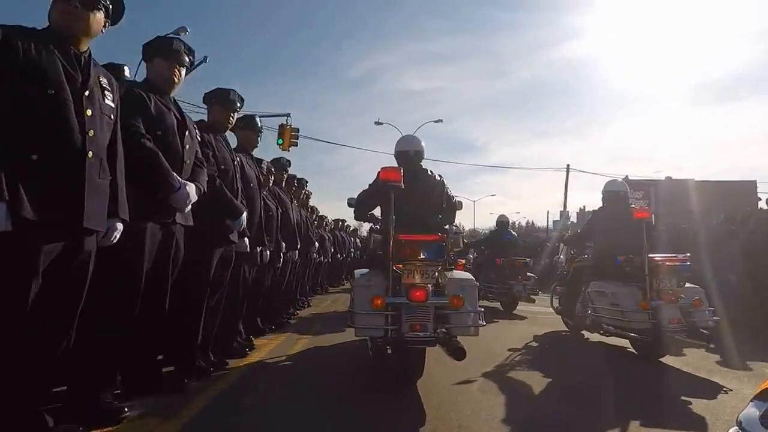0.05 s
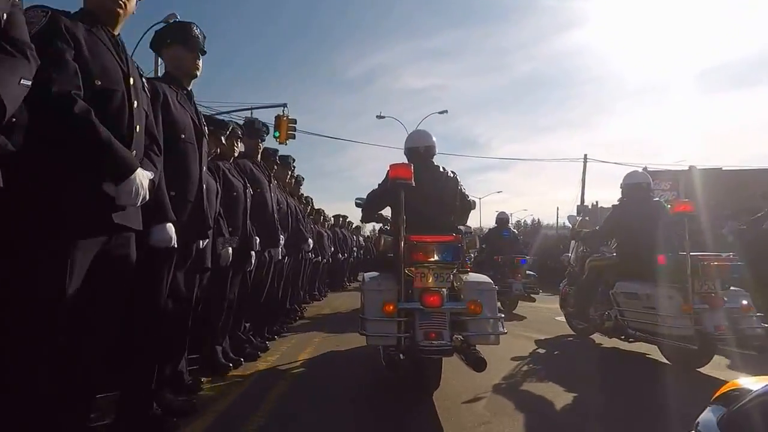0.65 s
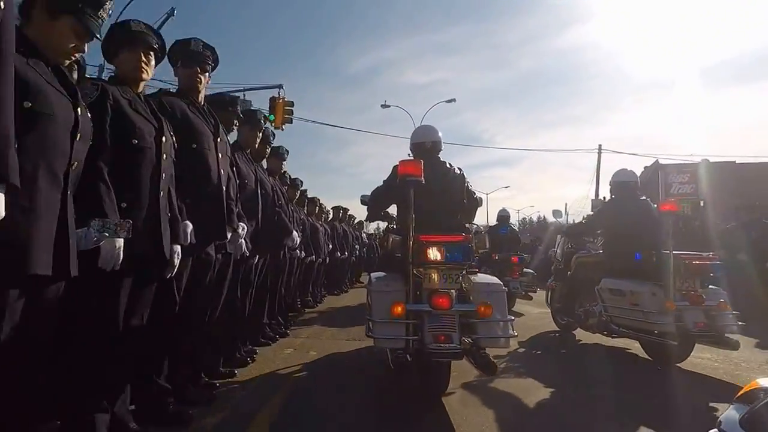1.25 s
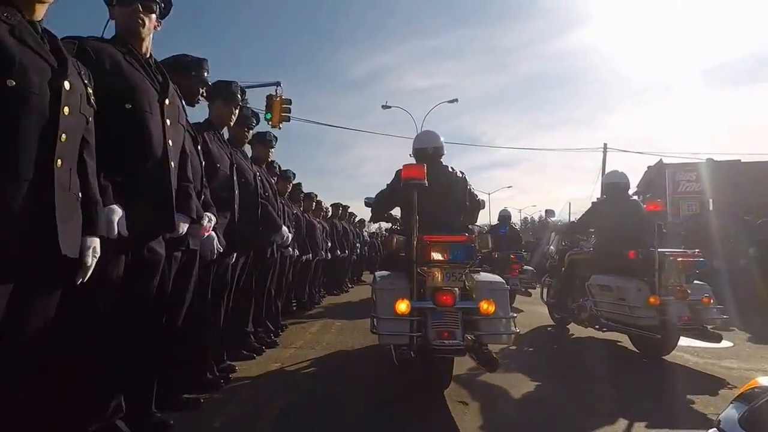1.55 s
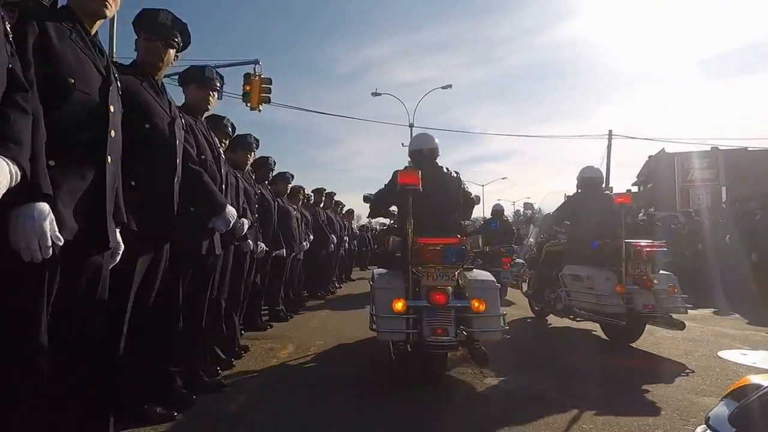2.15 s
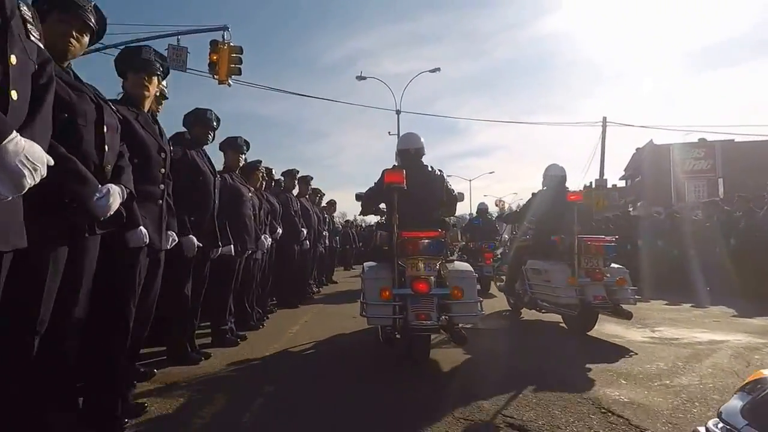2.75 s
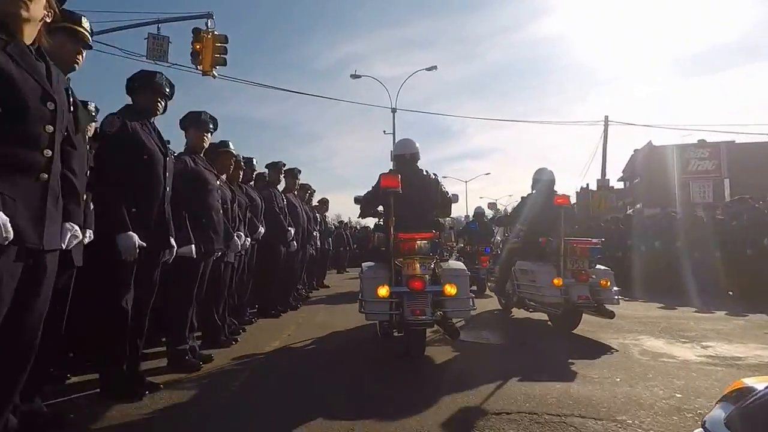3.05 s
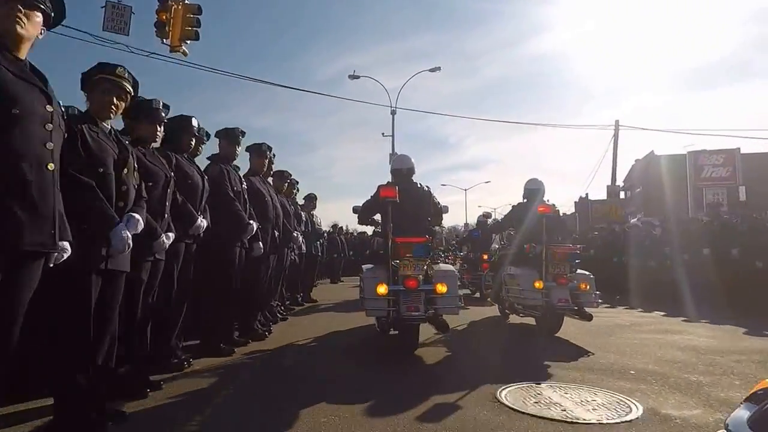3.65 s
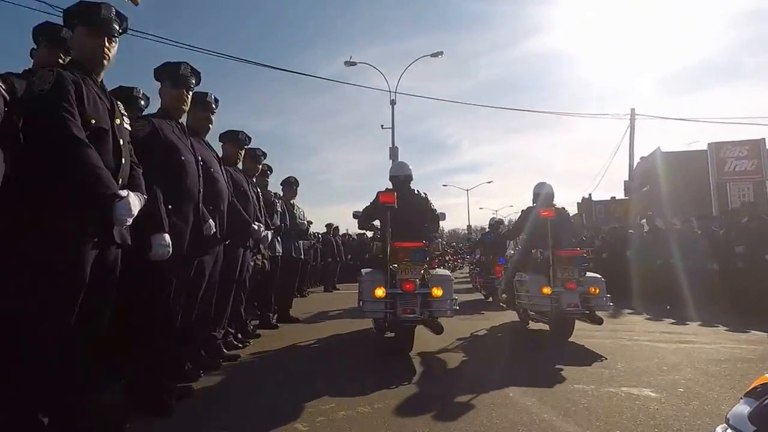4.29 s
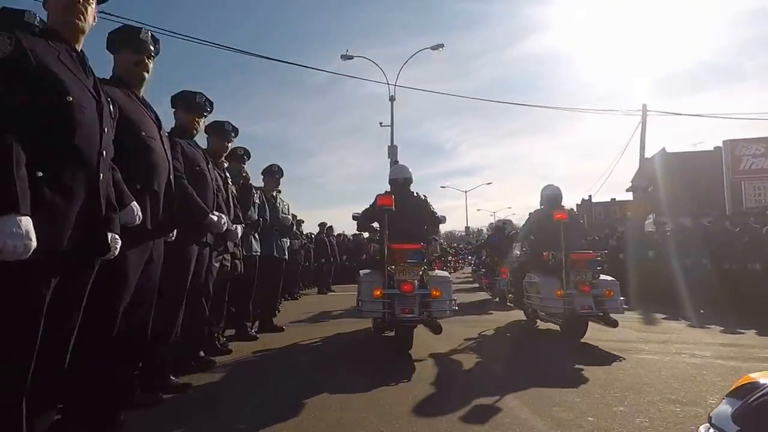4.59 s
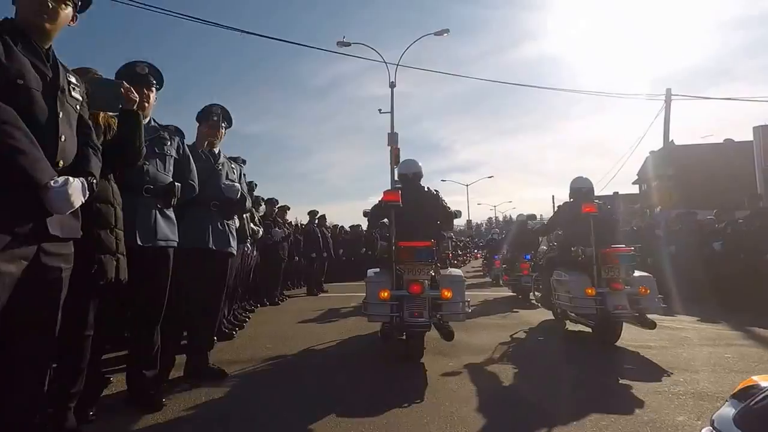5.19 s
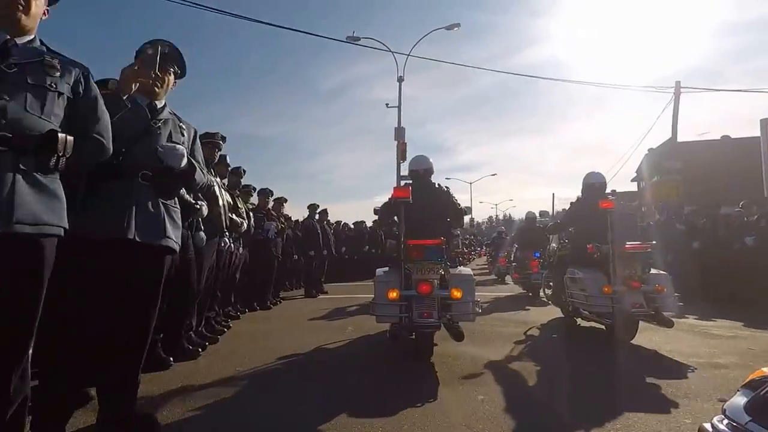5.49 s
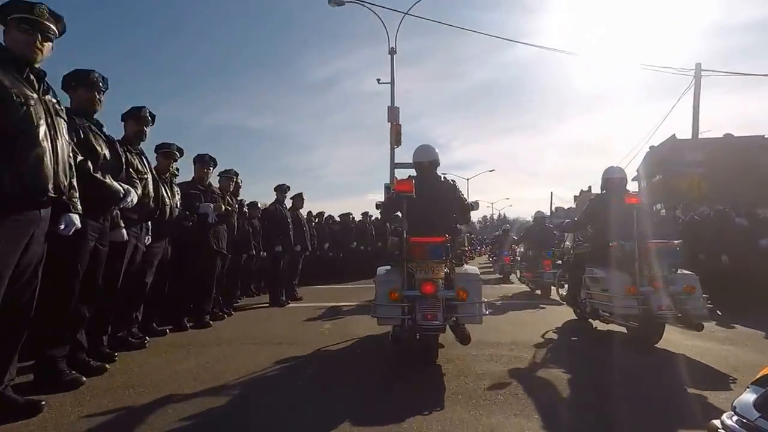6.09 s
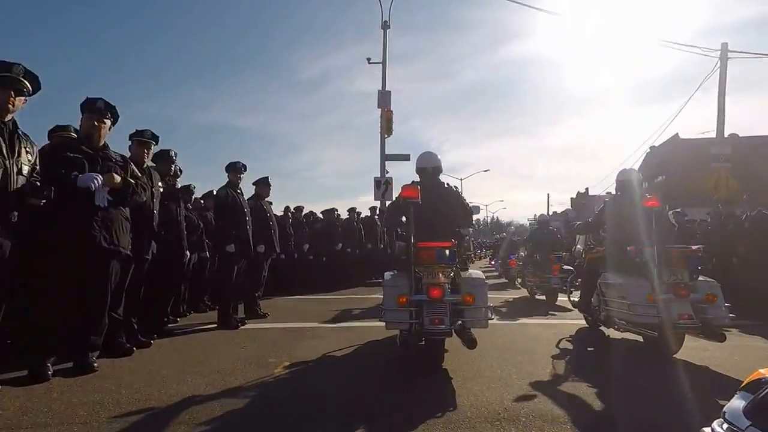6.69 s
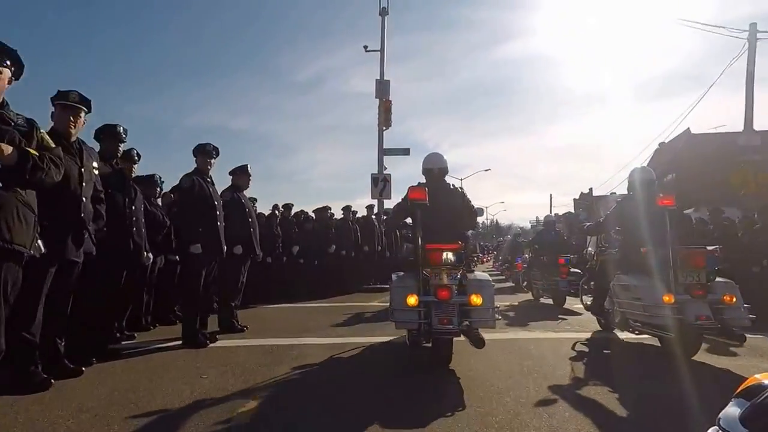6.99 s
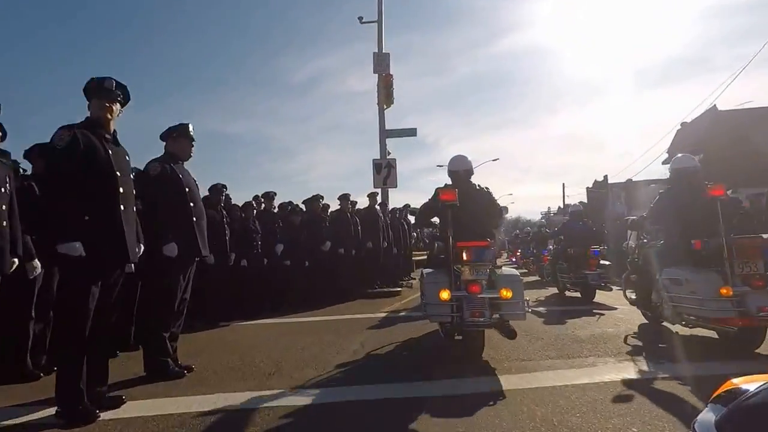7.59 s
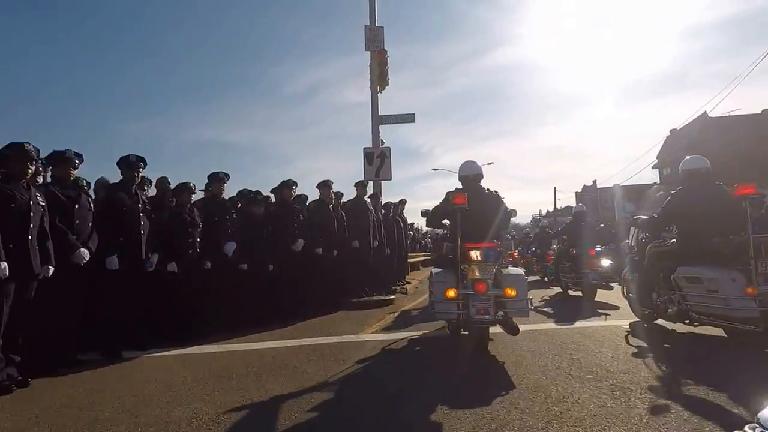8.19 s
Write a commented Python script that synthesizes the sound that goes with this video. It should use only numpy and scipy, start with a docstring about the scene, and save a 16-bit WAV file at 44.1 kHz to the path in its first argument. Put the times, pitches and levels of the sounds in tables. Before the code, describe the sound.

Heard from on board, a slow motorcycle chugs with a deep, shaking throb and busy mechanical ticking. The throttle opens a little and eases off twice, the engine sinks to a low idle, then two quicker swells follow. Pistons clank lightly now and then. Several more motorcycles drone close ahead, drifting in and out of step, with faint street traffic underneath.

```python
"""A V-twin motorcycle rolls along a street at walking pace, barely above idle, with four throttle swells.
Its crank shakes the mount of an on-board camera and its firings boom through exhaust and bodywork.
The valve gear clatters and ticks, the pistons slap their cylinders, and one tiny squeak slips out.
More motorcycles chug along just ahead, over a soft wash of traffic."""
import sys
import numpy as np
from scipy import signal
from scipy.fft import rfft, irfft, next_fast_len
from scipy.io import wavfile
from scipy.ndimage import uniform_filter1d, map_coordinates

SR = 44100
rng = np.random.default_rng(int(sys.argv[2]) if len(sys.argv) > 2 else 0)


def wav_out(sig):
    """Save sig, one row per channel (or a flat mono array), as 16-bit PCM at SR to the path in sys.argv[1]."""
    wavfile.write(sys.argv[1], SR, np.round(np.clip(np.atleast_2d(sig).T, -1, 1) * 32767).astype(np.int16))


N = 372204
TIME = np.arange(N) / SR
# ring of a slapped cylinder: (frequency [Hz], width [Hz], gain [dB])
CYLINDER_MODES = [(1395, 63, -9.5), (1645, 68, 0.5), (1812, 140, -7), (2108, 120, -14.5)]


def exhaust(turns, speed):
    """The firings hum as a stack of harmonics; each booms as the speed carries it through a resonance."""
    # exhaust harmonics: (crank order [per turn], direct gain [dB], resonant gain [dB])
    harmonics = [(2, -64, -14.5), (2.5, -42, -18), (3, -38, -10), (3.5, -30, -34), (4, -46, -22.5),
                 (4.5, -45, -24), (5, -47, -27), (5.5, -47, -25), (6, -47, -36)]
    # exhaust resonances: (frequency [Hz], half width [Hz])
    hollows = [(66, 3.77), (131, 7.3)]
    # fader on the whole note: (time [s], gain [dB])
    fader = [(0, -8.5), (.3, -0.5), (.9, 2.5), (1.2, -5), (1.6, 2.5), (1.8, 1), (2.05, 1), (2.5, -1.5),
             (3.3, 0), (4.2, -3), (5.2, -4), (5.6, -8), (6.4, -0.5), (7, -3), (7.9, -1), (8.44, -1.5)]
    fader_db, = curves(fader)
    note = np.zeros(N)
    for order, direct_db, resonant_db in harmonics:
        resonance = sum(1 / (1 + ((order * speed - hz) / width) ** 2) for hz, width in hollows)
        # the mixture burns a little unevenly, so timing and size waver
        phase = order * turns + rng.random() + wobble(6) / 50
        gain = (amp(direct_db) + amp(resonant_db) * resonance) * amp(0.78 * wobble(13))
        note += gain * np.sqrt(2) * np.sin(2 * np.pi * phase)
    return amp(fader_db) * note


def crank_shake(turns, speed, mount_hz=27.5, width_hz=5.8):
    """The unbalanced crank shakes the mount once a turn, less as the speed leaves its resonance."""
    # brief dips in the deep shake: (time [s], half length [s], depth [dB])
    dips = [(.68, .17, -10), (1.36, 0.04, -4), (5.623, 0.069, -7), (6.331, 0.19, -14), (6.72, 0.065, -6),
            (7.751, 0.11, -2.5)]
    response = 1 / np.hypot(1, 2 * (speed - mount_hz) / width_hz)
    dips_db = sum(db * bump(s, half_length) for s, half_length, db in dips)
    return amp(-13 + dips_db) * response * unit(np.sin(2 * np.pi * turns))


def contacts(turns):
    """Pistons and valve gear repeat one run of blows each cycle; gives its thuds, clacks and ticks."""
    # blows of a two-turn cycle: (crank angle [turns], thud gain [dB], clack gain [dB], tick gain [dB])
    pattern = [(0.098, 7, -30, 7), (0.268, -1, 24.5, -46), (0.534, 7, 13, -32), (0.655, 1.5, 16.5, 13),
               (.77, 0, 2, 16), (0.979, -3.5, 14, 6.5), (1.19, -6.5, -37, 7), (1.331, -0.5, 16.5, 10),
               (1.568, -1, -11, 8.5), (1.691, 2, -10, 15)]
    angles, *gains_db = np.transpose(pattern)
    blows = np.array([strokes(turns, angle, scatter_db=1, jitter_s=.0001) for angle in angles])
    return [unit(amp(db) @ blows) for db in gains_db]


def panel_rumble(shake, speed):
    """Dull blows ring the body panels, louder while the engine gains speed."""
    # panel resonances: (frequency [Hz], width [Hz], gain [dB])
    modes = [(209, 37, -44), (239.6, 12.9, -1), (293.4, 22, 5.5), (385, 35, -1.5), (462.3, 30, -5),
             (501.7, 33, -3.5), (704.7, 31, -9), (863, 60, -6), (1061, 140, -16.5)]
    rumble = effort_gain(-36.5, 1.95) * even(ring(shake, modes, low_hz=196, high_hz=1270))
    acceleration = uniform_filter1d(np.gradient(speed) * SR, size=SR // 5)  # turns/s per second
    return amp(0.0778 * acceleration) * rumble


def fairing_song(shake, turns, speed):
    """The fairing rings with the blows and sings as engine harmonics sweep onto its resonance."""
    # fairing resonances: (frequency [Hz], width [Hz], gain [dB])
    modes = [(643, 44, 9), (670, 32, -20)]
    # whining engine harmonics: (crank order [per turn], gain [dB])
    harmonics = [(18.5, -10), (20.5, -9), (22, -13)]
    # the whine throbs at cruise and steadies at speed: (crank speed [turns/s], depth [nepers])
    throb_depths = [(29, .5), (30.5, 1.7), (31.7, 1.7), (33.5, .25)]
    # swells of the song: (time [s], relative level [dB])
    fader = [(0.0, -44.5), (0.63, -46.5), (1.48, -36.5), (1.55, -41), (1.69, -33), (2.07, -41.5),
             (2.11, -38), (2.44, -42), (3.62, -35.5), (4.47, -45), (5.69, -47.5), (6.53, -37.5),
             (7.05, -47), (7.69, -40.5), (7.78, -40), (7.9, -34.5), (8.37, -46.5), (8.44, -43)]
    fader_db, = curves(fader)
    whine = sum(amp(db) * np.sin(2 * np.pi * order * turns) for order, db in harmonics)
    depth = np.interp(speed, *np.transpose(throb_depths))
    throb = np.exp(depth * np.cos(np.pi * (turns - 1.8)))  # peaks on the rear cylinder's power stroke
    song = ring(shake + amp(-8) * throb * whine, modes, low_hz=610, high_hz=700)
    return amp(fader_db + 0.5) * even(song)


def valve_clatter(clacks, ticks):
    """Hard contacts ring the casing and the cooling fins over a steady churn."""
    # engine casing resonances: (frequency [Hz], width [Hz], gain [dB])
    casing_modes = [(1308, 43, 3.5), (1384, 40, 5), (1500, 95, -3), (1588, 37, 3.5), (1654, 66, 4),
                    (1745, 27, 2), (1809, 108, 1), (2013, 78, -0.5), (2178, 145, -2.5), (2430, 58, -8)]
    # cooling fin resonances: (frequency [Hz], width [Hz], gain [dB])
    fin_modes = [(2720, 150, -9), (2912, 235, 6.5), (3172, 175, 10), (3320, 268, 10.5), (3518, 115, 8.5),
                 (3844, 460, 6.5), (4067, 220, -1), (4324, 260, 9.5), (5660, 520, -3.5), (5750, 170, -9),
                 (7200, 140, 1.5), (7680, 780, -3.5), (8200, 400, -6.5), (9900, 1350, -11.5)]
    blows = clacks + bursts(clacks, decay_s=0.0064)
    casing_drive = blows + amp(5.5) * rng.standard_normal(N)
    fin_drive = amp(-20) * blows + bursts(ticks, decay_s=0.011) + amp(3.5) * rng.standard_normal(N)
    clatter = even(ring(casing_drive, casing_modes, low_hz=1205, high_hz=2900))
    hiss = even(ring(fin_drive, fin_modes, low_hz=2250, high_hz=13100))
    return effort_gain(-37.5, 1.55) * clatter + effort_gain(-47.5, 2.07) * hiss


def tappets(ticks, scatter_db=7):
    """Tappets give dry ticks and crisp snaps; no two valves seat equally hard."""
    # tone of a tick: (frequency [Hz], gain [dB])
    tick_eq = [(2000, -35), (4000, 2), (7500, -4), (9000, -6.5), (10500, -11.5), (12000, -22), (13500, -17),
               (15000, -26)]
    # tone of a snap: (frequency [Hz], gain [dB])
    snap_eq = [(5000, -25), (8000, -3), (11000, -3), (13500, -3), (15000, -7)]
    tick_hits, snap_hits = ticks * amp(scatter_db * rng.uniform(-1, 1, (2, N)))
    ticking = coloured(bursts(tick_hits, decay_s=0.0092), tick_eq)
    snapping = coloured(bursts(snap_hits, decay_s=0.0018), snap_eq)
    return effort_gain(-57, 1.5) * ticking + effort_gain(-66, 1.7) * snapping


def piston_slap(turns):
    """Each piston rocks once a cycle and rings its cylinder; a brief chatter colours every slap."""
    # slap under the changing load: (time [s], rear level [dB], front level [dB])
    faders = [(0, -38, -51), (.5, -42, -43), (1.05, -41.5, -48), (1.5, -42.5, -40), (2, -51, -40.5),
              (2.4, -42, -46), (3.1, -41, -45), (4.2, -40.5, -45), (4.5, -45, -47.5), (5.4, -48, -55),
              (5.8, -43, -61), (6.55, -44, -41), (7.05, -48, -48), (7.9, -52, -42), (8.44, -45, -48)]
    slaps = np.zeros(N)
    for angle, level_db in zip((1.57, .52), curves(faders)):
        blows = unit(strokes(turns, angle, scatter_db=1, jitter_s=.0005))
        chatter = amp(-7) * bursts(blows, decay_s=.006)
        slaps += amp(level_db) * ring(blows + chatter, CYLINDER_MODES, low_hz=1160, high_hz=2510)
    return slaps


def piston_knocks(lead_s=.003):
    """Now and then a piston slaps harder and the cylinder clanks."""
    # the hardest slaps: (time [s], relative level [dB])
    hits = [(0.2186, -23), (0.295, -35), (0.4476, -20), (0.6403, -27), (0.682, -27), (1.1104, -25),
            (1.1794, -24), (3.1807, -27.5), (3.2447, -24), (3.893, -28), (3.9612, -20), (4.1046, -23),
            (5.3582, -24), (5.6766, -19), (5.9125, -23), (5.9923, -21.5), (6.2467, -22), (6.33, -18),
            (6.8843, -19)]
    times, db = np.transpose(hits)
    blows = np.bincount(((times - lead_s) * SR).astype(int), amp(db), N)
    clank = ring(blows, CYLINDER_MODES, low_hz=1200, high_hz=2400)
    return amp(db.max() - 2.5) * clank / np.abs(clank).max()


def squeak(start_s=0.99, length_s=0.033, pitch_hz=12950, width_hz=130, db=-50):
    """A brief, very high metallic squeak."""
    tone = unit(filtered(rng.standard_normal(N), lambda f: np.exp(-((f - pitch_hz) / width_hz) ** 2)))
    return amp(db) * tone * bump(start_s + length_s / 2, length_s / 2)


def firings(turns, rear_db=-4.5):
    """Cylinders set 45 degrees apart fire in a limping pair."""
    front, rear = (strokes(turns, angle, scatter_db=3, jitter_s=.00058) for angle in (.55, .55 + 9 / 8))
    return unit(front + amp(rear_db) * rear)


def motorcycles_ahead():
    """Three like engines drift in and out of step; now and then their exhausts swell."""
    # pace of the group: (time [s], crank speed [turns/s], base level [dB])
    ride = [(0, 28.1, -26), (1.3, 30.7, -29), (2.2, 31, -28), (2.5, 28, -28.5), (3.1, 28.4, -21),
            (5.4, 28.1, -26), (5.8, 26.6, -22), (6.6, 29.5, -19), (7, 27, -27), (8.44, 27.4, -25)]
    # short exhaust swells: (time [s], half length [s], boom boost [dB], drone boost [dB])
    surges = [(5.69, 0.12, 3.5, 4.5), (6.225, 0.067, 8.5, 6), (6.492, 0.11, 4.5, 8), (7.848, 0.1, 9, 9.5),
              (8.15, 0.039, 8.5, 0)]
    # booming pipe resonances: (frequency [Hz], width [Hz], gain [dB])
    pipe_modes = [(65.7, 8, 6), (77.6, 7.3, -15), (93.2, 21, -11.5)]
    # droning body resonances: (frequency [Hz], width [Hz], gain [dB])
    body_modes = [(132.2, 18.6, 4.5), (157.5, 40, -17), (184.3, 11.6, -19)]
    speed, base_db = curves(ride)
    cranks = [np.cumsum(speed + 1.3 * wobble(1.2)) / SR + rng.random() for _ in range(3)]
    pulses = sum(firings(turns) for turns in cranks)
    boom_db = base_db + sum(db * bump(s, half_length) for s, half_length, db, _ in surges)
    drone_db = base_db - 2 + sum(db * bump(s, half_length) for s, half_length, _, db in surges)
    boom = even(ring(pulses, pipe_modes, low_hz=67.6, high_hz=130.4))
    drone = even(ring(pulses, body_modes, low_hz=90.6, high_hz=216))
    return amp(boom_db) * boom + amp(drone_db) * drone


def street():
    """Tyres and distant engines blend into a soft wash."""
    # dark traffic bed: (frequency [Hz], gain [dB])
    traffic_eq = [(20, -17), (70, -7.5), (160, -14.5), (300, -22), (570, -31.5), (1000, -30.5), (1220, -34),
                  (2300, -38.5), (4000, -45), (6500, -55.5), (10000, -60.5), (15000, -65.5)]
    return amp(-32 + 0.9 * wobble(2.635)) * coloured(rng.standard_normal(N), traffic_eq)


def effort_gain(base_db, growth):
    """Gain of a layer: base_db at average engine effort, plus growth dB per dB of extra effort."""
    # how hard the engine works, as mechanical noise: (time [s], relative level [dB])
    effort = [(0.1, -40), (0.24, -40), (1.89, -38), (2.21, -40), (3.09, -39), (3.78, -39), (3.82, -39),
              (5.48, -41.5), (5.71, -40), (6.44, -39), (6.49, -37), (6.86, -40), (7.45, -41), (7.82, -39),
              (8.3, -40), (8.35, -40.5)]
    effort_db, = curves(effort)
    return amp(base_db + growth * (effort_db - effort_db.mean()))


def strokes(turns, angle, scatter_db, jitter_s, cycles=200):
    """One impulse every two crank turns at the given angle (turns), uneven in size and timing."""
    timing, size = rng.standard_normal((cycles, 2)).T
    when = np.interp(2 * np.arange(cycles) + angle, turns, TIME, right=2 * TIME[-1]) + jitter_s * timing
    heard = (when > 0) & (when < TIME[-1])
    return np.bincount((when[heard] * SR).astype(int), amp(scatter_db * size[heard]), N)


def bursts(pulses, decay_s):
    """Each impulse becomes a dying puff of noise; rms 1."""
    envelope = signal.lfilter([1], [1, -np.exp(-1 / (decay_s * SR))], pulses)
    return unit(envelope * rng.standard_normal(N))


def ring(x, modes, low_hz, high_hz):
    """x through parallel resonances, each passed twice, then a band-pass; rms 1."""
    def response(f):
        return sum(amp(db) * (1j * f * width / (hz * hz - f * f + 1j * f * width)) ** 2
                   for hz, width, db in modes)
    band = signal.butter(2, [low_hz, high_hz], "band", fs=SR, output="sos")
    return unit(signal.sosfilt(band, filtered(x, response)))


def coloured(x, eq):
    """x through an EQ curve of (frequency [Hz], gain [dB]) points; rms 1."""
    hz, db = np.transpose(eq)
    return unit(filtered(x, lambda f: amp(np.interp(np.log(f + 1), np.log(hz), db))))


def filtered(x, response):
    """x through a complex frequency response."""
    size = next_fast_len(N + SR // 2)
    return irfft(rfft(x, size) * response(np.fft.rfftfreq(size, 1 / SR)), size)[:N]


def even(x):
    """Hold the rms near 1 over every few engine cycles, keeping the single beats."""
    power = uniform_filter1d(uniform_filter1d(x ** 2, size=SR // 7), size=SR // 10)
    return x / np.sqrt(np.abs(power) + 1e-20)


def curves(rows):
    """One value per sample for each column after the time."""
    times, *columns = np.transpose(rows)
    return [np.interp(TIME, times, column) for column in columns]


def wobble(rate):
    """A smooth random curve, rate knots a second."""
    return map_coordinates(rng.standard_normal(400), [TIME * rate], mode="wrap")


def bump(centre_s, half_length_s):
    """A bell-shaped envelope of height 1."""
    return np.exp(-((TIME - centre_s) / half_length_s) ** 2)


def amp(db):
    """Decibels to gain."""
    return 10 ** (np.asarray(db) / 20)


def unit(x):
    """Scale to rms 1."""
    return x / np.sqrt(np.mean(x ** 2) + 1e-20)


def scene():
    """The crank sets the rhythm of the near motorcycle; the other riders and the street lie behind it."""
    # the rider opens the throttle four times: (time [s], crank speed [turns/s])
    ride = [(0, 26.6), (.3, 25.9), (.7, 26.1), (.95, 28.2), (1.15, 29.2), (1.35, 30.4), (1.48, 31.1),
            (1.65, 34.6), (1.82, 34.6), (2.05, 32.6), (2.3, 29.8), (2.65, 28.3), (2.95, 30.3), (3.25, 30.6),
            (3.62, 31.6), (3.9, 29.4), (4.2, 27.25), (5.1, 27.25), (5.4, 25.1), (5.8, 25.6), (6.1, 23.4),
            (6.32, 24.4), (6.58, 31.6), (6.8, 28.1), (7.05, 27.1), (7.52, 28), (7.7, 31.7), (7.93, 36.1),
            (8.15, 30.7), (8.44, 23.8)]
    speed, = curves(ride)
    turns = np.cumsum(speed) / SR - .136
    thuds, clacks, ticks = contacts(turns)
    low_end = exhaust(turns, speed) + crank_shake(turns, speed)
    shake = thuds + amp(-18) * bursts(thuds, decay_s=.008)
    bodywork = panel_rumble(shake, speed) + fairing_song(shake, turns, speed)
    mechanics = valve_clatter(clacks, ticks) + tappets(ticks) + piston_slap(turns) + piston_knocks()
    return (low_end + bodywork + mechanics + squeak() + motorcycles_ahead() + street())[None]


def record(dry, top_hz=15250):
    """The camera keeps nothing above its band limit."""
    return filtered(dry[0], lambda hz: hz < top_hz)[None]


dry = scene()
out = record(dry)
wav_out(out)
```